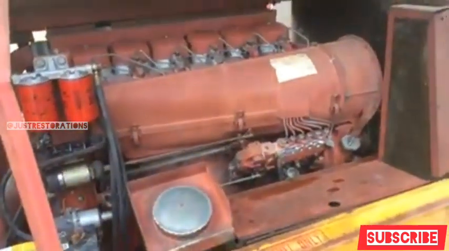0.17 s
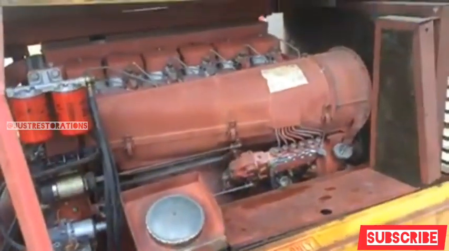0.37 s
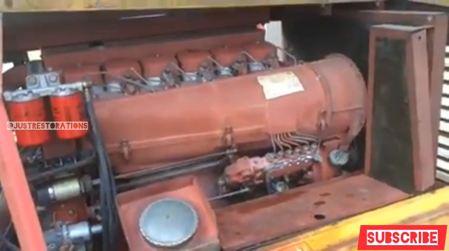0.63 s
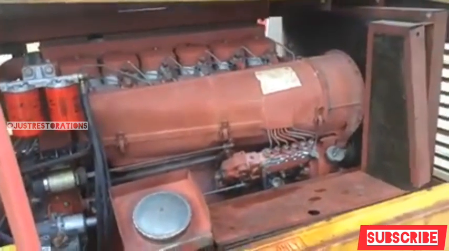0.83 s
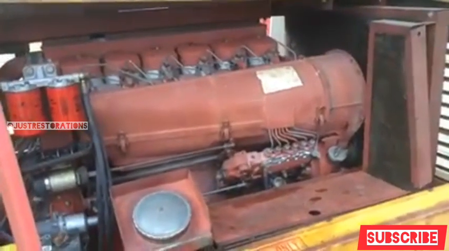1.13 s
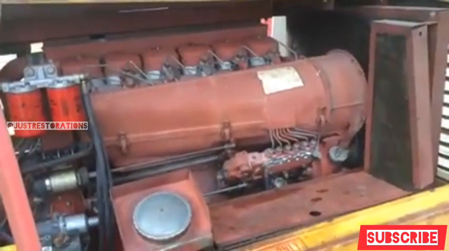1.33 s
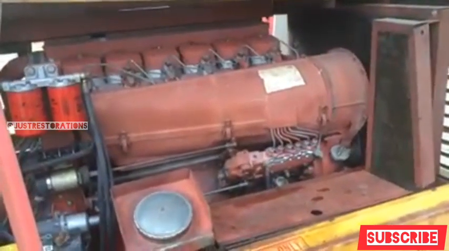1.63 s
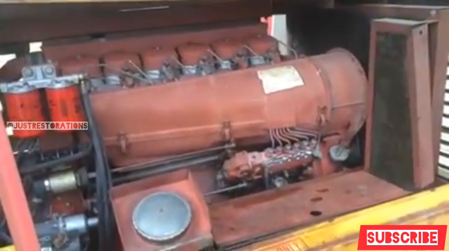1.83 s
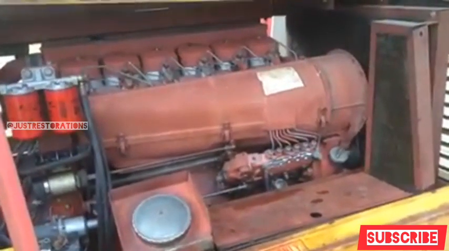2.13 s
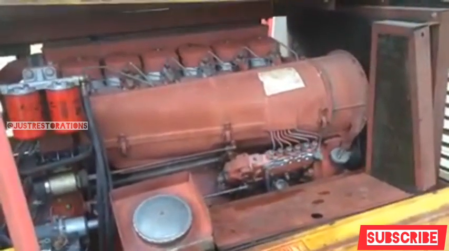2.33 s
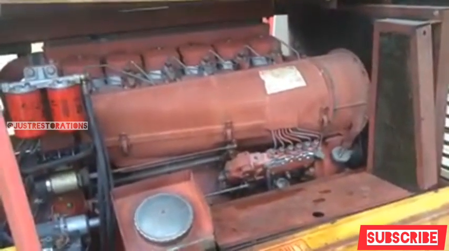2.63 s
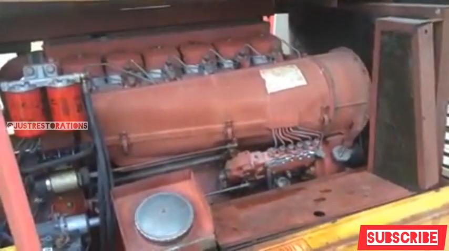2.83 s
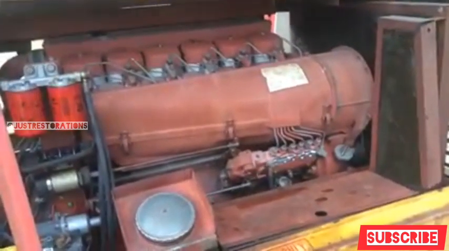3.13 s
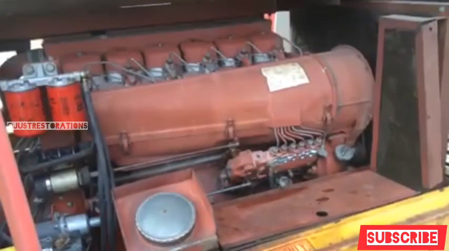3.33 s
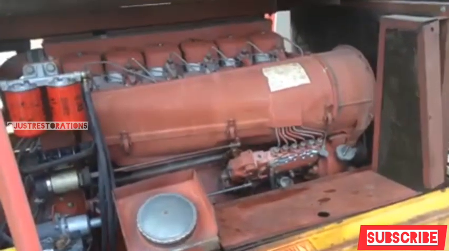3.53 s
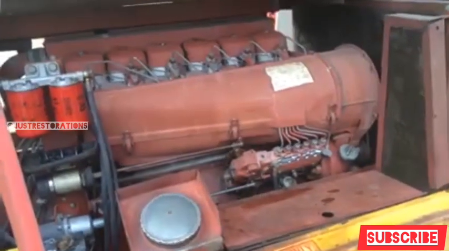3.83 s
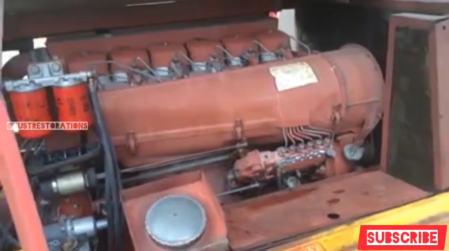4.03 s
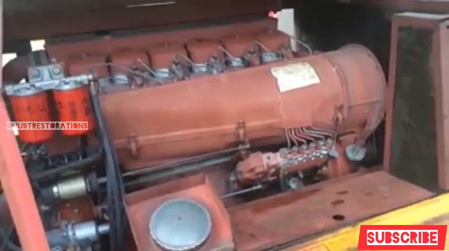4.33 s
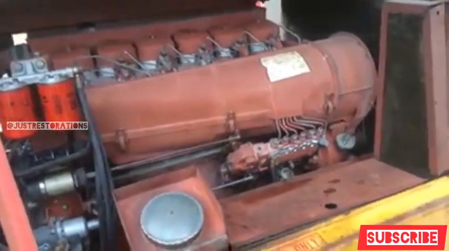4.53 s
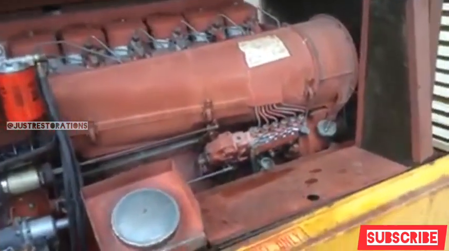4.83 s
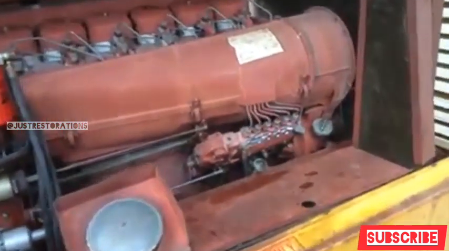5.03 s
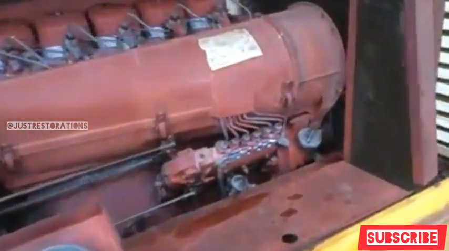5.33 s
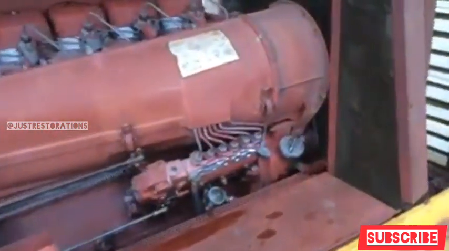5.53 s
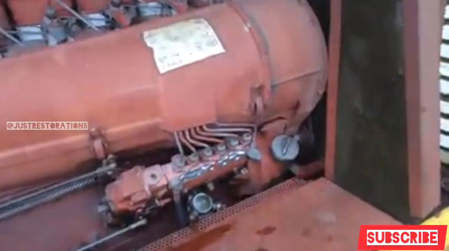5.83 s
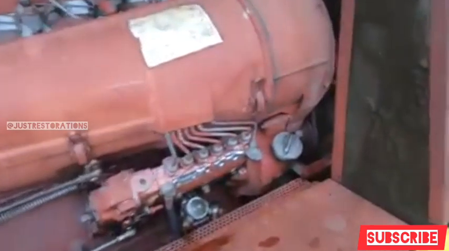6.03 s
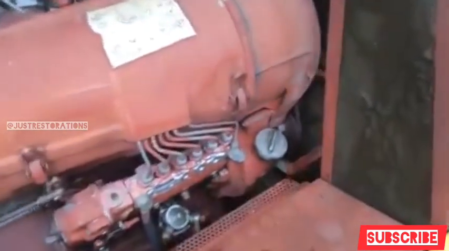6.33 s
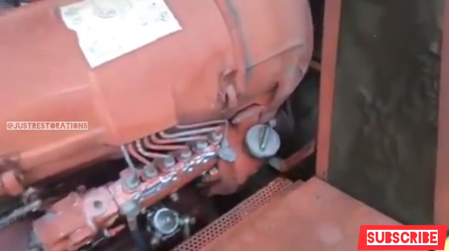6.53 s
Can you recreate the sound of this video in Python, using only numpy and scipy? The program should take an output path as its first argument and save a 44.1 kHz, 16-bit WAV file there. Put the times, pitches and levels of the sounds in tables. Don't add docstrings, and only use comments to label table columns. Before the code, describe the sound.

A switch snaps in a quiet yard, a starter clashes in and cranks, and a six-cylinder diesel catches, surges, then settles into clattering idle.

```python
import sys
import numpy as np
from scipy import signal
from scipy.fft import rfft, irfft, next_fast_len
from scipy.io import wavfile

SR = 44100
rng = np.random.default_rng(int(sys.argv[2]) if len(sys.argv) > 2 else 0)


def master_out(mix):
    frames = np.transpose(np.atleast_2d(mix))
    ceiling = np.clip(frames, -1, 1)
    pcm = np.round(ceiling * 32767).astype(np.int16)
    wavfile.write(sys.argv[1], SR, pcm)


def voltage_ratio(level):
    return 10 ** (np.asarray(level, float) / 20)


N = 294588
TIME = np.arange(N) / SR
CATCH_S, CATCH_TAKES_S = 1.84, 0.31
HIGH_TONE_START_S, HIGH_TONE_END_S = 2.412, 2.985
APPROACH_S = 5.27


def in_time(rows):
    s, *columns = np.transpose(rows)
    return np.array([np.interp(TIME, s, c) for c in columns])


def at_hz(points, hz):
    points_hz, values = np.array(points).T
    return np.interp(np.log(hz), np.log(points_hz), values)


def rms_one(x, start=0):
    return x / np.sqrt(np.mean(x[start:] ** 2) + 1e-20)


def ramp(start_s, takes_s):
    return np.clip((TIME - start_s) / takes_s, 0, 1)


def approach():
    return ramp(APPROACH_S, 0.88)


def fuel():
    return ramp(CATCH_S, CATCH_TAKES_S) * (1 - ramp(2.53, 0.43))


def drift(rate_hz):
    knots = rng.standard_normal(7 * 40 + 2)
    place = TIME[::8] * np.clip(rate_hz, .1, 39)
    return np.repeat(np.interp(place, np.arange(len(knots)), knots), 8)[:N]


def slow_gain(db):
    return np.repeat(voltage_ratio(db[::8]), 8)[:N]


def coloured(x, spectrum):
    size = next_fast_len(N + 4096)
    hz = np.maximum(np.arange(size // 2 + 1) * SR / size, 1)
    return irfft(rfft(x, size) * voltage_ratio(at_hz(spectrum, hz)), size)[:N]


def butter(x, order, hz, kind):
    return signal.sosfilt(signal.butter(order, hz, kind, fs=SR, output="sos"), x)


def ring(x, hz, t60):
    r, w = voltage_ratio(-60 / (t60 * SR)), 2 * np.pi * hz / SR
    return signal.lfilter([0, np.sin(w)], [1, -2 * r * np.cos(w), r * r], x + 1e-18)


def resonances(x, peaks, trim_db):
    out = 0
    for hz, width_hz, db in peaks:
        r = np.exp(-np.pi * width_hz / SR)
        zeros = [(1 - r * r) / 2, 0, (r * r - 1) / 2]
        poles = [1, -2 * r * np.cos(2 * np.pi * hz / SR), r * r]
        out = out + voltage_ratio(db + trim_db) * signal.lfilter(zeros, poles, x)
    return out


def blows(events, tone, trim_db, rise_s):
    noise = rms_one(coloured(rng.standard_normal(N), tone))
    highs = butter(noise, 1, 3000.0, "high")
    out, age = np.zeros(N), TIME[:SR // 2]
    for s, db, t60, bright_db in events:
        shape = (1 - np.exp(-age / rise_s)) * voltage_ratio(db + trim_db - 60 * age / max(t60, .01))
        at = round(s * SR)
        span = slice(at, at + len(age))
        out[span] += shape * (noise[span] + (voltage_ratio(bright_db) - 1) * highs[span])
    return out


# frequency in Hz, level in dB per Hz.
YARD_TONE = [(25, -29), (65, 0), (120, 1.5), (160, -9.5), (215, -9.5), (300, -20.5), (600, -15), (850, -13),
             (1050, -19), (1300, -22), (2000, -32), (4000, -42.5), (8000, -51.5), (15000, -70)]


def yard():
    duck_db = -4 * ramp(0.42, .04) * (1 - ramp(0.553, 0.19))
    rumble_db = -37 + duck_db + np.clip(TIME - .7, 0, 1.0)
    hiss_db = -44 + duck_db
    low = butter(coloured(rng.standard_normal(N), YARD_TONE), 2, 300.0, "low")
    high = butter(coloured(rng.standard_normal(N), YARD_TONE), 2, 260.0, "high")
    return voltage_ratio(rumble_db + 1.4 * drift(22)) * rms_one(low) + voltage_ratio(hiss_db + 0.5) * rms_one(high)


# start in seconds, peak in dB, decay t60 in seconds, brightness in dB.
SWITCH_BLOWS = [
    (0.2832, -32, 0.11, -3),
    (0.3057, -19, 0.092, 1),
    (0.338, -0.5, 0.062, 6),
    (0.3444, -7.5, 0.15, -6.5),
    (0.3507, -10, 0.094, -12.5),
    (0.404, -25.5, 0.11, -1),
]
# frequency in Hz, level in dB per Hz.
SWITCH_TONE = [(88, -34), (150, -4), (481, -9.5), (631, -12.5), (912, -4), (1270, -9), (2270, -2),
               (2550, -10), (3350, -4.5), (14300, -10.5), (15500, -12.5)]
# frequency in Hz, level in dB, decay t60 in seconds.
SWITCH_RING = [(1760, -35.5, 0.0295), (4450, -45.5, 0.046), (4750, -53.5, .1), (7120, -56.5, .15),
               (7600, -55, .2), (7900, -58, .15), (10170, -46, .06)]


def switch():
    snap = blows(SWITCH_BLOWS, SWITCH_TONE, trim_db=-11.5, rise_s=.0012)
    return snap + sum(voltage_ratio(db) * ring(snap, hz, t60) for hz, db, t60 in SWITCH_RING)


# start in seconds, peak in dB, decay t60 in seconds, brightness in dB.
PINION_BLOWS = [(1.4837, -13, 0.11, 0), (1.493, -12, 0.087, 0), (1.5205, 3.5, 0.12, 0),
                (1.5387, -2.5, 0.14, 0), (1.6797, -9.5, 0.12, 0), (1.914, -8.5, 0.15, 0),
                (1.927, -9, 0.088, .3), (1.9394, -6, 0.091, .3), (2.0113, -1, 0.14, 0.0062),
                (2.1375, 2.5, 0.12, 0), (2.1954, 0.5, 0.09, 0), (2.415, 3, 0.11, .3)]
# frequency in Hz, level in dB per Hz.
PINION_TONE = [(88, -32), (190, 1.5), (560, -10.5), (860, -13), (1420, -4.5), (1540, -30), (1910, -7),
               (2100, -11), (5540, -17.5), (15500, -30)]


def pinion():
    return blows(PINION_BLOWS, PINION_TONE, trim_db=-10.5, rise_s=0.0045)


# start in seconds, level in dB,
# frequency in Hz, decay t60 in seconds.
KNOCKS = [(.303, -33, 4450, .05), (.305, -26, 10170, 0.056), (.34, -13, 1870, 0.038), (.37, -50, 7150, .2),
          (.37, -48.5, 7400, 0.27), (.37, -50, 7750, .2), (.41, -48, 4760, .15), (1.55, -16, 264, 0.27),
          (1.62, -17, 210, 0.23), (1.674, -19.5, 2700, 0.073), (1.78, -16, 840, .1),
          (1.84, -17, 1294, 0.066), (1.924, -10.5, 356, 0.14), (1.945, -25, 1324, .06),
          (2.105, -11.5, 1060, 0.088), (2.17, -11.5, 640, 0.14), (2.196, -7, 7050, 0.061),
          (2.206, -2.5, 1420, 0.036), (2.4, -10.5, 669, 0.22), (3.05, -12.5, 4700, .1)]


def knocks():
    out, age = np.zeros(N), TIME[:SR // 2]
    for s, db, hz, t60 in KNOCKS:
        at = round(s * SR)
        decay = (1 - np.exp(-age / 0.0023)) * voltage_ratio(db - 60 * age / max(t60, .01))
        out[at:at + len(age)] += decay * np.sin(2 * np.pi * hz * age)
    return out


# start in seconds, peak in dB, pipe frequency in Hz.
THUDS = [
    (1.55, -18.5, 99.6),
    (1.751, -24, 92),
    (1.891, -15.5, 90),
    (1.977, -13, 96),
    (2.046, -9, 111),
    (2.089, -8, 99),
    (2.124, -7, 113),
]


def first_firings():
    out = np.zeros(N)
    push = np.hanning(220) / 110
    for s, db, hz in THUDS:
        click = np.zeros(N)
        click[round(s * SR):][:len(push)] = voltage_ratio(db + 2.5) * push
        out += ring(click, hz, t60=0.16)
    return butter(out, 2, [53.0, 500.0], "band")


# time in seconds, firings per second.
SPEED = [(1.5, 5), (1.89, 11), (2.0, 12), (2.07, 26.6), (2.15, 31.3), (2.29, 47.1), (2.39, 56.6),
         (2.49, 67.7), (2.55, 72.3), (2.63, 75), (2.7, 77.1), (3.0, 76.8), (3.3, 76.35), (3.7, 76.35),
         (4.9, 76.08), (5.3, 76.2), (6.1, 76.55), (6.68, 76.7)]


def firing_rate():
    return in_time(SPEED)[0]


def crank():
    hard_at_s = 5.944
    cycles = np.cumsum(firing_rate() * (TIME > 1.5)) / SR / 6
    return cycles + 2 - cycles[round(hard_at_s * SR)] % 2


# meshes per cycle, prominence in dB.
TEETH = [(150.9, 4.5), (158.9, 3), (235, -.5), (218, -1), (369, -2)]


def whine(cycles):
    high_tone_on = (TIME > HIGH_TONE_START_S) * (TIME < HIGH_TONE_END_S)
    out = voltage_ratio(-35) * np.sin(2 * np.pi * 14643 * TIME) * high_tone_on
    idle_db, near_db = np.c_[[-29.5, -33.5, -36.5, -31, -35]], np.c_[[-5, 2, 6, -2, -6]]
    fuel_db = np.c_[[0.9, 1.5, 0.13, .3, .3]]
    levels = idle_db + near_db * ramp(APPROACH_S, 0.37) + fuel_db * fuel()
    for (teeth, lift_db), db in zip(TEETH, levels):
        gain = ramp(2.2, .35) * slow_gain(db + lift_db + 3 * drift(25))
        out = out + gain * np.sin(2 * np.pi * teeth * cycles + .7 * drift(25))
    return out


def hard_cylinder(cycles, ring_orders, length):
    turn = np.round(cycles)
    angle = cycles - turn
    skip_start_s, skip_end_s = 2.84, 3.8
    skipping = (TIME > skip_start_s) * (TIME < skip_end_s)
    hunt_period_s, hunt_weak_at_s = .54, 4.98
    hunt_db = -3 * (1 - .7 * ramp(5.9, .3)) * np.cos(2 * np.pi * (TIME - hunt_weak_at_s) / hunt_period_s)
    skip_db = 4 - 12 * (turn % 2)
    thump_db = -16 + 4 * approach() + np.where(skipping, skip_db, hunt_db * (TIME > skip_end_s))
    luck_db = rng.normal(0, 0.98, 100)[turn.astype(int)]
    packet = np.exp(-(angle / length) ** 2) * np.cos(2 * np.pi * ring_orders * angle)
    return voltage_ratio(thump_db + luck_db) * packet * ramp(2.55, 0.18)


# multiple of the two-turn cycle, level in dB.
CYCLE = [(1, -38), (2, -33), (3, -23), (4, -21), (5, -16), (6, 0), (7, -10), (8, -5), (9, -11), (10, -11),
         (11, -16), (12, -9), (13, -10), (14, -15), (15, -9), (16, -15), (17, -16), (18, -13), (19, -23),
         (20, -17), (21, -20), (22, -11), (23, -20), (24, -12), (25, -24), (26, -14), (27, -17), (28, -24),
         (29, -24), (30, -16)]
BLOCK = [33, 34, 36, 38, 45, 47, 51, 52, 55, 56, 62, 66, 69, 70, 74, 76, 79, 106, 116, 148]
BLOCK_DB = [-18, -18, -12, -17, -12, -17, -12, -11, -13, -11, -17, -13, -16, -16, -14, -15, -17, -11, -14,
            -15]


def uneven_orders(cycles):
    near, out = approach(), 0
    orders = CYCLE + list(zip(BLOCK, BLOCK_DB))
    for (order, db), start in zip(orders, rng.uniform(0, 2 * np.pi, 50)):
        if order in (6, 7, 8, 9, 10, 12, 18):
            continue
        level_db = db + 2.8 * drift(2.5 + order / 8) - 1.5 * near * (order > 32)
        phase = 2 * np.pi * order * cycles + start + order / 70 * drift(9)
        out = out + slow_gain(level_db) * np.sin(phase)
    return voltage_ratio(-21.5 - 30.0 * (1 - ramp(2.31, 0.39))) * rms_one(out)


# frequency in Hz, level in dB.
PIPE = [(30, -42), (60, -34), (72, -21), (98, -14.5), (145, -26.5), (190, -19), (240, -22.5), (380, -36)]
FULL_FUEL_DB = [-.6, -3, -0.1, -4, 0.2]


def exhaust(cycles):
    idling = ramp(2.7, 0.061)
    firing_hz = firing_rate()
    gains = np.array([slow_gain(at_hz(PIPE, (k + 1) * firing_hz) + db) for k, db in enumerate(FULL_FUEL_DB)])
    gains = gains * ramp(2.08, .07) * (1 - idling) * voltage_ratio(1.5 * drift(35))
    idle_db, near_db = np.c_[[-24.5, -32.5, -34]], np.c_[[5.5, 7.5, -10]]
    gains[:3] += idling * voltage_ratio(idle_db + near_db * approach() + 1.4 * drift(5))
    out = uneven_orders(cycles)
    for k, gain in enumerate(gains):
        out = out + 2 ** .5 * gain * np.cos(12 * np.pi * (k + 1) * cycles)
    return out


def contacts(cycles):
    angles, sizes = rng.random(900), rng.standard_normal(900)
    turns = np.arange(np.ceil(cycles[0]), cycles[-1])[:, None] + angles
    at = np.interp(turns, cycles, np.arange(N)).astype(int)
    out = np.zeros(N)
    np.add.at(out, at.ravel(), np.tile(sizes, len(turns)))
    even = np.sqrt(cycles[-1] / (np.gradient(cycles) * N + 1e-3))
    return rms_one(out * even, start=N // 2)


# frequency in Hz, share 0-1.
REPEATS = [(60, .2), (300, .5), (800, .55), (1400, .35), (3000, .25), (6000, .1)]
# time in seconds, level in dB over idle.
SHAKE = [(1.44, -60), (1.47, -36), (1.49, -10), (1.545, 3.5), (1.6, -4), (1.72, -4.5), (1.8, -3.5),
         (1.875, -7), (1.94, -3), (1.975, -5.5), (2.12, 0), (2.3, 1.5), (2.95, 1.5), (3.2, -0.74),
         (4.4, 0.07), (6.3, 1.46), (6.68, 2)]
# frequency in Hz, level in dB.
SPIN_IN_TONE = [(200, -9), (800, -23), (2500, 3.5), (8000, -4)]
# frequency in Hz, level in dB.
CRANKING_TONE = [(200, 7.5), (800, 5), (2500, -1.5), (8000, -9.5)]
# frequency in Hz, level in dB.
FULL_FUEL_TONE = [(150, 5), (330, 8), (480, 4), (800, 3.5), (1500, 1.1), (2500, -1), (8000, -1)]
# frequency in Hz, level in dB.
NEAR_TONE = [(150, 0.5), (240, -4), (330, 4), (470, 5), (580, 0.5), (1000, 0.8), (2500, .2), (8000, -0.4)]


def clatter_and_roar(cycles):
    strikes = contacts(cycles)
    pulse = voltage_ratio(0.67 * np.cos(12 * np.pi * cycles) + 0.56 * np.cos(4 * np.pi * cycles))
    roar = rng.standard_normal((2, N)) * pulse
    meshed, load = ramp(1.5, .045), fuel()
    cranking = meshed * (1 - ramp(CATCH_S, CATCH_TAKES_S))
    states = [(SPIN_IN_TONE, 1 - meshed), (CRANKING_TONE, cranking),
              (FULL_FUEL_TONE, load), (NEAR_TONE, approach())]
    shake_db = in_time(SHAKE)[0]
    out, edges = 0, 30 * 2 ** np.arange(0, 9.3, 1 / 3)
    for k, (low, high) in enumerate(zip(edges, edges[1:])):
        hz = np.sqrt(low * high)
        share = np.clip(at_hz(REPEATS, hz), 0, 1)
        level_db = shake_db + sum(at_hz(tone, hz) * weight for tone, weight in states)
        level_db = level_db - (hz < 150) * 12.0 * (TIME < 1.88)
        rough_db = 0.91 + .8 * load * (hz < 1500)
        level_db = level_db + rough_db * drift(9) + 1.22 * drift(35)
        source = np.sqrt(share) * strikes + np.sqrt(1 - share) * roar[k % 2]
        out = out + slow_gain(level_db) * butter(source, 2, [low, high], "band")
    return out


# frequency in Hz, level in dB per Hz.
HOUSING = [(25, -30), (70, -7.5), (250, -17.5), (520, -20), (680, -16.5), (1000, -14.5), (2000, -16),
           (2300, -18.5), (3000, -19), (4200, -21.5), (4700, -20.5), (8450, -23), (8650, -25.5),
           (15100, -29.5)]
# frequency in Hz, width in Hz, level in dB.
PANELS = [(950, 110, -3), (1485, 30, -3), (1880, 40, -3), (2060, 25, -3), (2400, 60, -4), (2780, 60, 2),
          (2985, 45, 1), (4690, 80, 3), (5800, 150, -5), (9550, 120, -3)]
# frequency in Hz, width in Hz, level in dB.
NEAR_PANELS = [(1660, 110, 1), (2030, 40, 2), (2990, 45, 4), (2480, 60, 0), (2150, 50, 0), (3500, 40, -3),
               (4960, 150, 2), (5950, 300, -3)]
# frequency in Hz, width in Hz, level in dB.
STARTER_CASE = [(210, 73, 3), (432, 31, 3), (665, 22, -6.5), (830, 140, -6.5), (1240, 82, -20)]


def housing(cycles):
    out = coloured(clatter_and_roar(cycles), HOUSING)
    out = out - 0.44 * butter(out, 2, 300.0, "low")
    caught, near = ramp(1.9, 0.32), ramp(5.2, 0.87)
    rings = caught * (1 - 0.71 * near) * resonances(out, PANELS, trim_db=-5.5)
    rings = rings + near * resonances(out, NEAR_PANELS, trim_db=-8.0)
    rings = rings + (1 - caught) * resonances(out, STARTER_CASE, trim_db=4.5)
    out = (0.51 + 0.61 * caught) * out + rings
    high_tone_on = (TIME > HIGH_TONE_START_S) * (TIME < HIGH_TONE_END_S)
    out = out - .75 * high_tone_on * coloured(out, [(14100, -60), (14250, 0), (15050, 0), (15200, -60)])
    return voltage_ratio(-14.5) * rms_one(out, start=N // 2)


def scene():
    cycles = crank()
    starting = switch() + pinion() + knocks() + first_firings()
    running = whine(cycles) + hard_cylinder(cycles, ring_orders=8.28, length=0.19)
    running = running + exhaust(cycles) + housing(cycles)
    return np.tile(yard() + starting + running, (2, 1))


def top_cut(x):
    return signal.sosfilt(signal.butter(12, 16450, fs=SR, output="sos"), x)


# frequency in Hz, level in dB.
TOP = [(15000, 0), (15250, -8), (15720, -11), (15850, -60.5)]


def record(dry):
    rounded = 1.271 * np.tanh(dry / 1.325)
    mix = np.tile(coloured(rounded[0], TOP), (2, 1))
    return top_cut(mix)


dry = scene()
out = record(dry)
master_out(out)
```